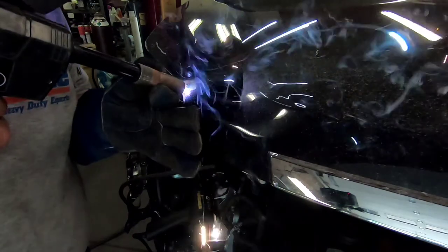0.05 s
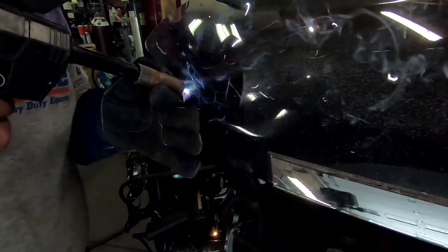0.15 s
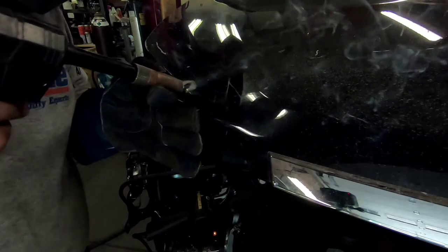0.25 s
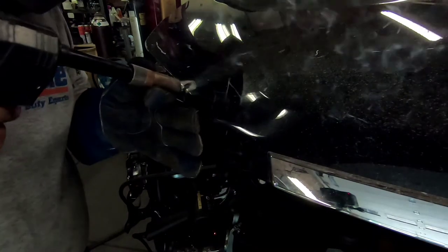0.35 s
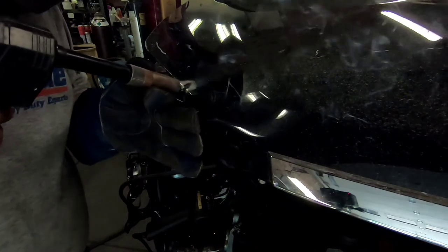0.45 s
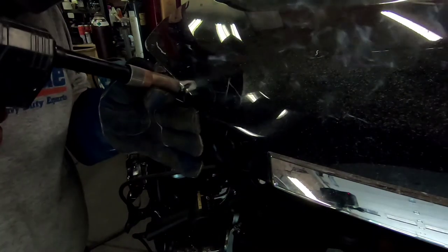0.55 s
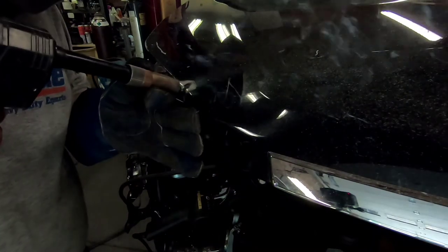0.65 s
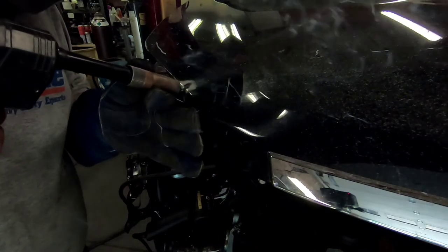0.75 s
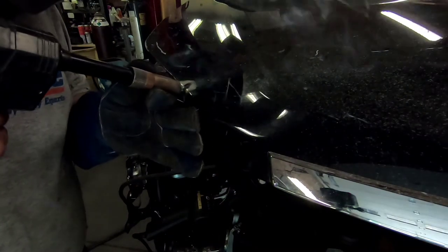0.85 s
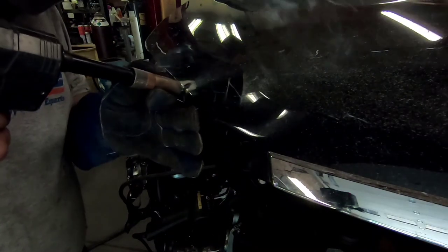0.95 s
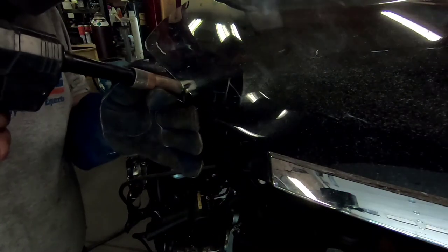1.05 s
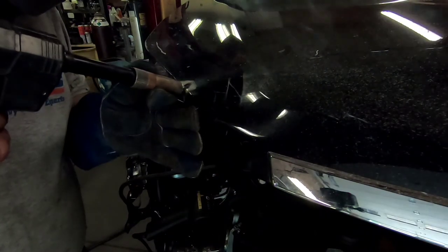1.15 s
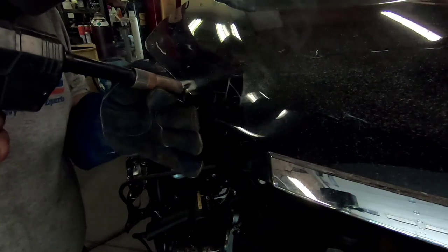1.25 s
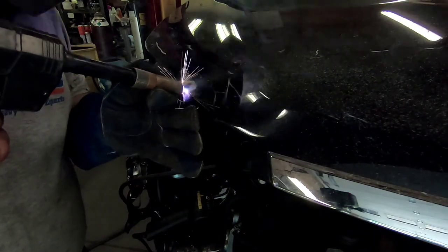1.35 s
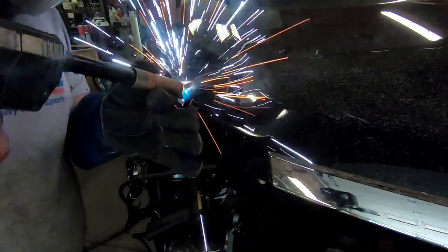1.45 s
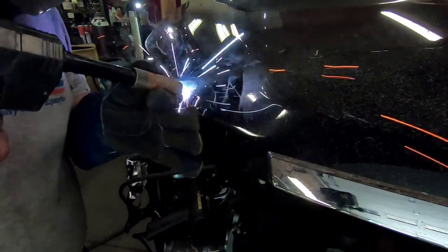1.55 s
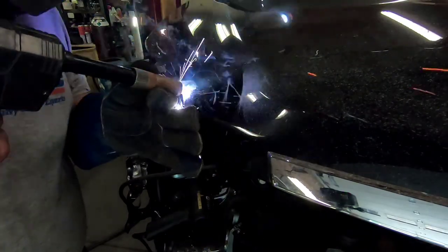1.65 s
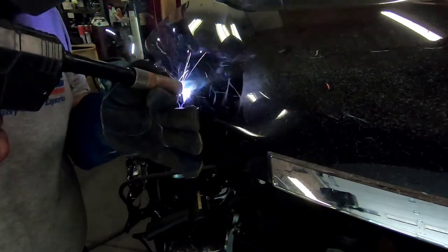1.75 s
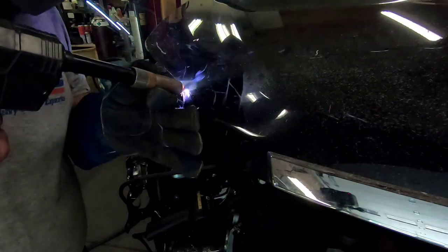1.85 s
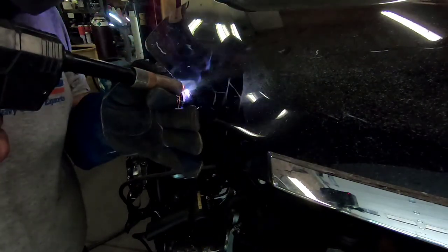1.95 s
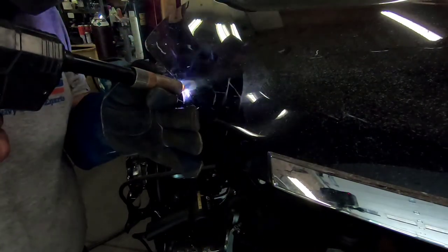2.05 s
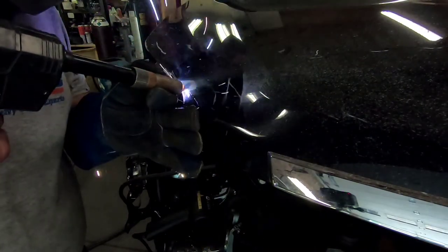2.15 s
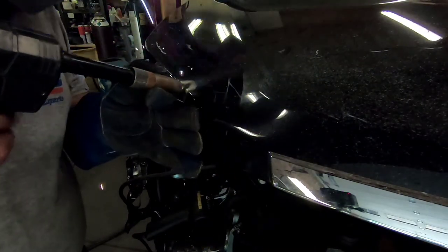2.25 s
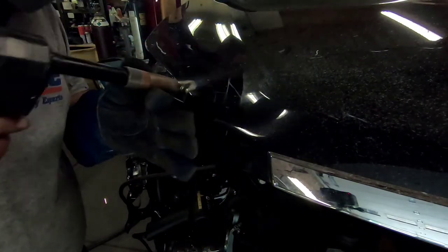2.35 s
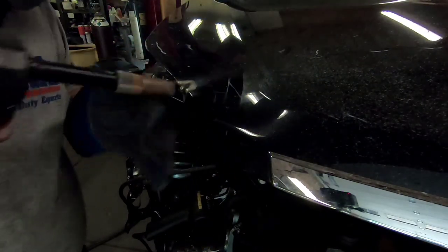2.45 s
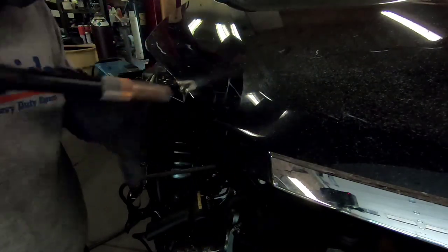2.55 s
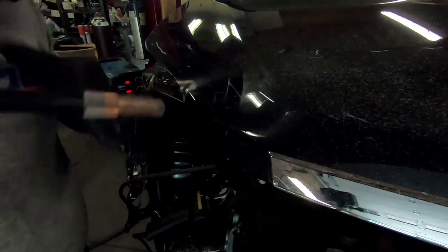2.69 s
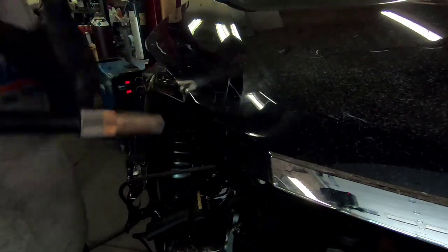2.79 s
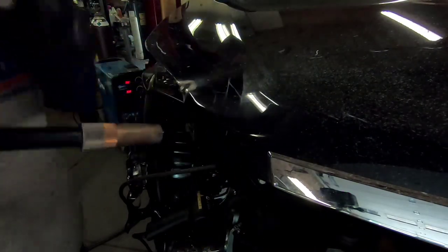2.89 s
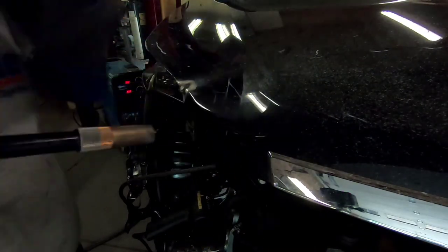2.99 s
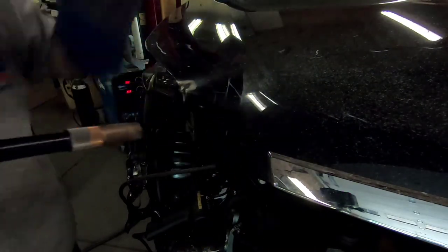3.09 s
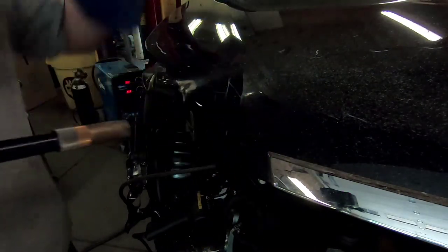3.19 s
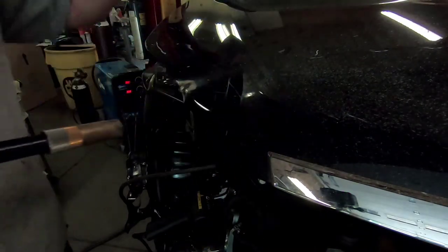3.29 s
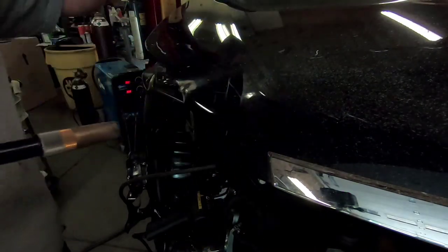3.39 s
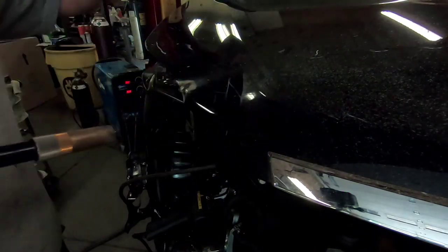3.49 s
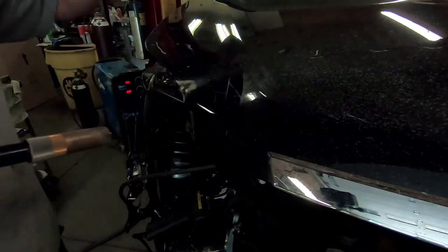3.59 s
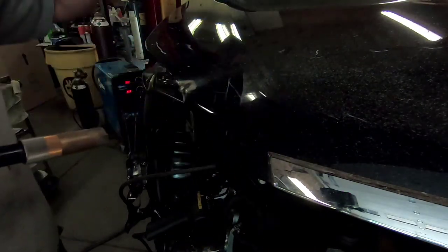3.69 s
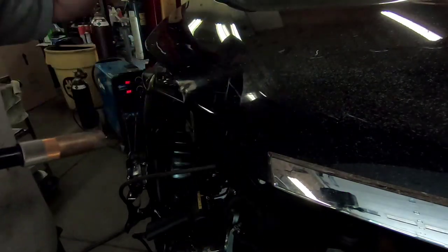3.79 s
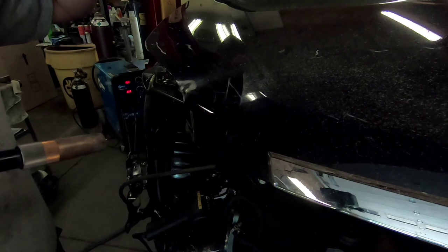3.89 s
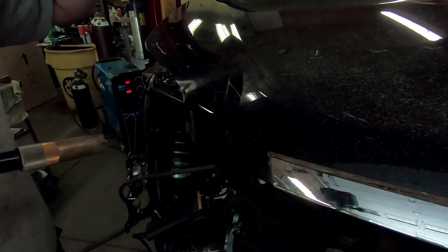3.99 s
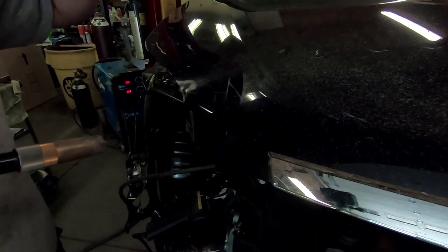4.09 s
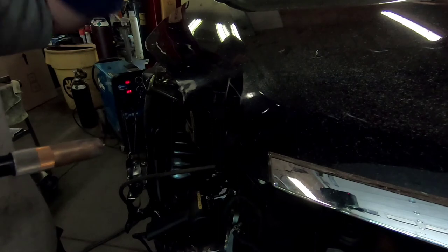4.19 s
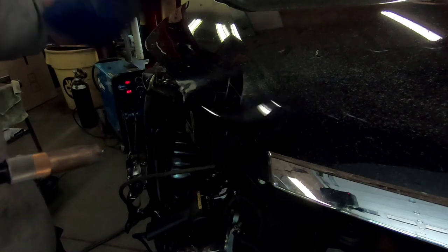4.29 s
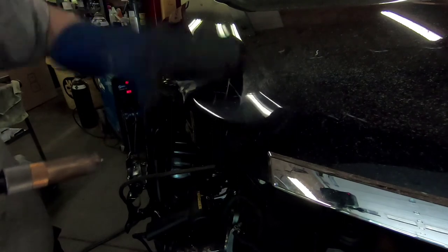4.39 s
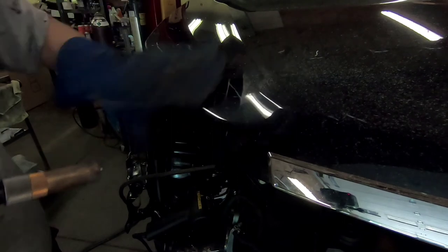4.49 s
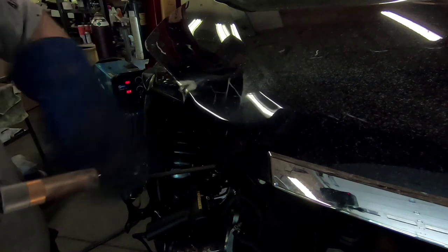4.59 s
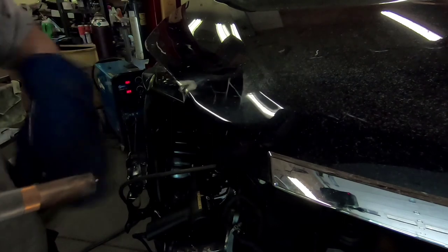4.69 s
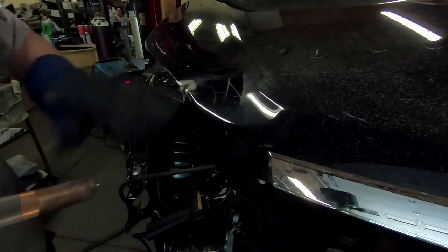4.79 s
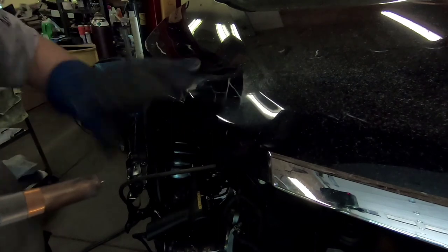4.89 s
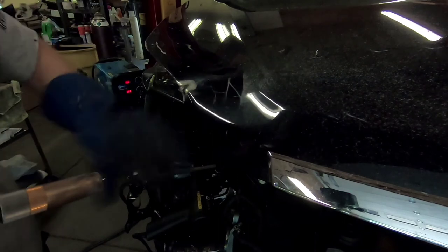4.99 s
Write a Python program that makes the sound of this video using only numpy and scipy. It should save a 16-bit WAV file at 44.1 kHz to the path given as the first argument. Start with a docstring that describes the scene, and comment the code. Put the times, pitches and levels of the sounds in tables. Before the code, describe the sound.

Loud, dry, close welding crackle stops almost at once, leaving faint distant rumble and a soft puff. Gas gushes out, the arc restarts unevenly with hard pops, and it spits steadily for under a second. Afterwards come a faint puff, cloth rubbing, a short metallic slide and several boomy handling knocks, with short garage echo.

```python
"""A garage with distant rumble outside, heard by a small camera with two microphone ports, a metre from
a wire-feed welder: one weld ends, then come a pause, a gush of shielding gas, a stuttering start and a steady
crackle. The welder then shifts, cloth rustles, and a glove knocks the frame that the camera rests on.
Welding and cloth are clicks and noise shaped by resonances; the knocks are fading sine waves; the gas and
rumble are filtered noise, and random echoes stand for the walls."""
import sys
import numpy as np
from scipy import signal
from scipy.fft import rfft, irfft
from scipy.io import wavfile
from scipy.ndimage import uniform_filter1d

SR = 44100
rng = np.random.default_rng(int(sys.argv[2]) if len(sys.argv) > 2 else 0)


def makeup_ratio(level_db):
    """Linear amplitude ratio for a level in decibels (20 dB per factor of ten)."""
    decades = np.asarray(level_db, float) / 20
    return 10 ** decades


def to_wav(sig):
    """Store sig (one row per channel, or 1-D mono) as 16-bit WAV at the path in sys.argv[1].

    Samples outside -1..1 are clipped; the rate is SR.
    """
    pcm = np.clip(np.atleast_2d(sig), -1, 1) * 32767
    pcm = np.round(pcm).astype(np.int16)
    wavfile.write(sys.argv[1], SR, pcm.T)  # frames by channels


N = 222264  # length in samples
T = np.arange(N) / SR  # time in seconds
HZ = np.fft.rfftfreq(4096, 1 / SR)  # frequencies at which filters are drawn

# All dB levels are relative ones, set before any resonance, echo or rounding of peaks.

# The arc striking again, each time with a cluster of sparks. Each row: start in seconds, level of the first
# snap in dB, level of the cluster in dB, length of the cluster in milliseconds.
STRIKES = [(0.0, -0.5, -23.5, 1.7), (0.0165, -3, -23, 6.9), (0.037, -3.5, -19.5, 6.2),
           (0.0524, -12.5, -34, 1.5), (0.0862, -1, -25.5, 6.6), (0.1172, -20, -25.5, 11),
           (0.1334, -13, -23.5, 13.4), (0.1573, 1, -26.5, 14.5), (0.1916, -8, -25.5, 15.4),
           (0.2173, -18, -31.5, 1.5), (0.2328, -10.5, -37.5, 2.2), (1.401, 2, -22, 1),
           (1.433, -3, -26, 1.7), (1.442, -0.5, -20.5, 1.2), (1.4509, -20, -23, 7),
           (1.4901, 8, -12.5, 2.44), (1.599, 0, -16.5, 2.2), (1.608, -6, -22.5, 6.9),
           (1.6434, -11.5, -27, 5.2), (1.6762, -10, -21, 4.6), (1.693, 1.5, -25, 12),
           (1.7154, -1.5, -23.5, 9.6), (1.7482, 0.5, -33, 8.4), (1.7707, -7, -20.5, 6.3),
           (1.8267, 0, -24, 12), (1.8684, 2, -31, 7.8), (1.887, -3, -21, 8), (1.9547, -1.5, -25, 11.4),
           (1.9928, -5, -26, 5.7), (2.0315, -1, -25, 3.8), (2.0542, -3, -21.5, 8), (2.0832, -7, -22.5, 9.5),
           (2.115, -2.5, -27, 10), (2.1315, -8, -28.5, 21), (2.1523, -3, -25.5, 10.4), (2.1795, -5, -23, 8),
           (2.2346, -16.5, -20.5, 6.9), (2.2549, -16.5, -20.5, 7.3), (2.2849, -2.5, -28, 9)]
# The arc burning, with small sparks between strikes. Each row: time it has settled in seconds, time the wire
# stops in seconds, level of the sizzle in dB, level of the low roar in dB.
WELDS = [(0.077, 0.197, -33, -41.5), (1.797, 2.285, -31.5, -40.5)]
# The sizzle creeps up from SETTLE_DB below its level and dies by 40 dB in QUENCH_S.
SETTLE_S, SETTLE_DB, QUENCH_S = 0.13, -9, 0.081
# The pressure thump grows faster than its cluster: dB for a cluster at 0 dB, and dB gained per dB.
THUMP_DB, THUMP_SLOPE = 29.5, 2.96

# Shielding gas: a surge when the valve opens, sagging by 40 dB in SAG_S and leaving a steady flow.
VALVE_S, OPENING_S, SURGE_DB, SAG_S, FLOW_DB = 1.1455, 0.03, -19.5, 0.5, -35.5
# The camera likely turns its gain down once the arc starts, so the hiss is heard fainter, at a set level.
# When the wire stops, the hiss bleeds away by 40 dB in BLEED_S.
FIRST_STRIKE_S, ARC_HISS_DB, BLEED_S = 1.41, -48, 0.067

# Tone of the sparks. Each row: frequency in Hz, level per Hz in dB.
SPARK_TONE = [(180, -31.5), (300, -3), (492, -6.5), (892, -6), (1330, -4), (2000, -2.5), (2400, -2.5),
              (3400, -1.5), (5050, -3), (5480, -2), (8560, -12), (9760, -18.5), (15500, -25)]
# Tone of the gas jet. Each row: frequency in Hz, level per Hz in dB.
JET_TONE = [(350, -43.5), (600, -26.5), (1150, -17.5), (1530, -21.5), (2100, -12), (3000, -5.5),
            (3700, -2.5), (4500, -7), (6000, -18), (8200, -24), (9760, -26.5), (12000, -27), (15500, -45.5)]
# Resonances of the work piece and camera housing. Each row: frequency in Hz, width in Hz, lift in dB.
HOUSING = [(873, 150, 3.5), (2068, 370, 6.5), (2770, 220, 4.5), (3423, 340, 6), (4700, 120, 4.5),
           (5400, 180, 5.5), (6400, 590, 7), (7800, 380, 11.5), (9505, 300, 15.5)]
# How much louder the torch is at the first port than at the second. Each row: frequency in Hz, gap in dB.
PORT_DB = [(1000, 0.5), (3500, 2), (5000, -2.5), (6500, -6), (8300, 4), (9600, 8), (11000, 11), (15000, 7)]
# How far the first port's phase leads the second's. Each row: frequency in Hz, lead in radians.
PORT_RAD = [(0, 0.5), (4500, 0.32), (6000, 1.23), (7000, 6), (9000, -0.5), (10000, 8.13), (12000, 1),
            (16000, 3.5)]

# Echo of the garage: time to fade by 60 dB in seconds, level in dB.
GARAGE_T60_S, GARAGE_DB = 0.61, -13.5
# Level of the background over time, dipping after loud strikes as the camera turns its gain down. Each row:
# time in seconds, then levels in dB of the high layer (above about 300 Hz), the middle layer (about 100 to
# 300 Hz) and the low layer (below about 100 Hz).
BACKGROUND = [(0, -60, -43, -47), (0.301, -57, -62, -60), (.75, -53, -54, -51), (1.45, -48, -49.5, -57),
              (1.55, -71, -45, -49), (2.3, -54, -55.5, -59), (2.95, -48, -48.5, -59),
              (4.2, -49.5, -52.5, -60.5), (5.04, -51.5, -52.5, -67)]
# Tone of the rumble. Each row: frequency in Hz, level per Hz in dB.
YARD_TONE = [(15, -34), (25, -9), (54, -11), (76, -26.5), (147, 0), (237, -1), (400, -14.5), (1020, -7),
             (1500, -15.5), (2600, -29), (5840, -37.5), (14000, -80.5)]
# How alike the rumble is at the two ports. Each row: frequency in Hz, likeness (1 is the same, 0 or less
# is taken as unrelated).
YARD_ALIKE = [(60, 0.87), (130, 0.93), (290, 0.98), (640, 0.64), (1410, 0.21), (3100, -0.13), (6820, -0.15),
              (15000, 0.2)]

# A puff of hiss about half a second after each weld, probably the valve closing. Each row: loudest moment in
# seconds, level of the dull band in dB, level of the bright band in dB.
PUFFS = [(0.77, -47, -55.5), (2.852, -46.5, -55.5)]
PUFF_RISE_S, PUFF_FALL_S = 0.012, 0.4
# Cloth and glove rubbing. Each row: loudest moment in seconds, rise in seconds, fall in seconds, level of the
# dull band in dB, level of the bright band in dB.
RUBS = [(2.82, 0.11, 0.24, -61.5, -89), (3.3, 0.79, 1.1, -63, -67), (3.58, 1.5, 0.34, -76, -73),
        (4.35, 0.66, 0.068, -56, -67.5), (4.372, 0.02, 0.76, -50.5, -93), (4.49, 0.088, 0.11, -52, -56),
        (4.56, 0.2, .15, -49, -78), (4.587, 0.058, .03, -40, -75), (4.608, 0.032, .03, -41, -73),
        (4.628, .04, .03, -39, -58), (4.755, 0.018, 0.043, -59, -69), (4.86, 0.44, 0.17, -69, -86),
        (5.025, 0.08, .3, -48, -64)]

# Small hard ticks near the camera. Each row: start in seconds, level in dB, pitch in Hz.
TICKS = [(2.823, -32.5, 2200), (2.853, -23, 4450), (3.043, -25, 8050), (4.365, -22.5, 2320),
         (4.473, -6.5, 2520), (4.477, -7.5, 1800), (4.619, -38, 2500), (4.849, -25.5, 2100),
         (5.0168, -20, 3360), (5.027, -20, 3930)]
# Glove knocks. Each row: start in seconds, clack on the panel in dB, thud in the frame in dB.
KNOCKS = [(2.949, -65, -38), (4.365, -40.5, -70), (4.472, -20, -34), (4.481, -34, -15.5), (4.619, -25, -16),
          (4.847, -60, -33), (4.869, -22.5, -59), (4.873, -22, -43), (5.0183, -35.5, -38),
          (5.031, -55, -15)]
# Ringing of the frame. Each row: pitch in Hz, level in dB, time to fade by 60 dB in seconds.
FRAME_MODES = [(67.2, -18, 1), (85.5, -11, 0.46), (154, -3, 0.036), (196, 4, 0.013)]
# Ringing of the panel. Each row: pitch in Hz, level in dB, time to fade by 60 dB in seconds.
PANEL_MODES = [(261, 3, 0.11), (440, 7.5, 0.15), (652, 5.5, 0.1), (835, -14, 0.084), (970, 9, 0.022),
               (1564, 3, 0.056), (2100, -23, 0.03)]
# The glove dragging on the frame. Each row: start of full strength in seconds, length in seconds, low shaking
# in dB, scrape at roughly 0.2 to 1.5 kHz in dB.
DRAGS = [(4.476, 0.1, -31, -47), (4.602, 0.033, -32.5, -43.5), (4.874, 0.014, -38.5, -35.5),
         (5.02, 0.016, -34, -40)]
GRIP_S, SHAKE_FALL_S, SCRAPE_FALL_S = 0.027, 0.26, 0.039  # rise of both, then the fall of each

# Something small slides and rings just before the glove strikes hard.
SLIDE_S, SLIDE_LENGTH_S, SLIDE_DB = 4.372, 0.041, -54
# Its resonances. Each row: frequency in Hz, width in Hz, level in dB.
SLIDE_RINGS = [(2300, 300, 4), (3700, 200, -0.5), (4600, 160, -5.5)]


def unit(x):
    """Scale to rms 1."""
    return x / np.sqrt(np.mean(x ** 2))


def on_hz(table, hz):
    """Read a table of frequencies and values on a log-frequency axis."""
    f, value = np.transpose(table)
    return np.interp(np.log(hz + 1), np.log(f + 1), value)


def band(x, lo_hz, hi_hz):
    """Keep the sound between two frequencies."""
    edges = [lo_hz, min(hi_hz, .45 * SR)]
    return signal.sosfilt(signal.butter(2, edges, "band", fs=SR, output="sos"), x)


def swell(s, rise_s, hold_s, fall_s, from_db=-40):
    """Gain that climbs from from_db to 1 at time s, holds, sinks by 40 dB, then cuts to silence."""
    corners = s + np.cumsum([-rise_s, rise_s, hold_s, fall_s])
    return makeup_ratio(np.interp(T, corners, [from_db, 0, 0, -40], -200, -200))


def walk(rate):
    """Wandering level: random values, rate of them a second, smoothed twice; spread about 1."""
    hold = int(SR / rate)
    steps = np.repeat(rng.standard_normal(N // hold + 1), hold)
    return unit(uniform_filter1d(uniform_filter1d(steps, hold), hold)[:N])


def sparks(rate, spread_db, pull):
    """Clicks at uneven gaps and of uneven size; the share pull goes negative (the plasma collapses)."""
    gap, sign, size = rng.random((int(2 * rate * N / SR), 3)).T
    when = np.cumsum((.25 + 1.5 * gap) * SR / rate).astype(int)
    clicks = np.zeros(when[-1] + 1)
    loudness_db = spread_db * np.minimum(-np.log(size), 4)  # many weak ones, few strong ones
    clicks[when] = np.where(sign < pull, -1., 1.) * makeup_ratio(loudness_db)
    return unit(clicks[:N])


def thump(hz, t60):
    """A sine wave that fades by 60 dB in t60 seconds, as a struck or pushed body does."""
    t = T[:8000]
    return np.sin(2 * np.pi * hz * t) * makeup_ratio(-60 * t / t60)


def modes(table):
    """Sum of the fading sine waves in which a solid body rings."""
    return sum(makeup_ratio(db) * thump(hz, t60) for hz, db, t60 in table)


def causal(db, side_db=0, rad=0):
    """Shortest response with this gain, scaled to unit energy, then tilted and phase-turned for one port."""
    cepstrum = irfft(db * np.log(10) / 20)
    # folding the cepstrum puts the energy as early as possible
    cepstrum[1:2048] *= 2
    cepstrum[2049:] = 0
    gain = np.exp(rfft(cepstrum))
    energy = np.mean(np.abs(gain) ** 2)
    response = irfft(gain * makeup_ratio(side_db) * np.exp(1j * rad)) / np.sqrt(energy)
    return np.roll(response, 32)[:2048]  # 32 samples of room for what the turn moves earlier


def through(x, response):
    """Pass a sound through a response, undoing its 32-sample lead-in."""
    return signal.fftconvolve(x, response)[32:N + 32]


def housing():
    """Lift in dB over frequency from the resonances of the work piece and camera housing."""
    return sum(lift * np.exp(-((HZ - f) / width) ** 2) for f, width, lift in HOUSING)


def ports(x, tone):
    """A source at the torch, coloured by work piece and housing, as each port hears it."""
    db = on_hz(tone, HZ) + housing()
    side_db = on_hz(PORT_DB, HZ) / 2
    rad = np.interp(HZ, *np.transpose(PORT_RAD)) / 2
    return np.array([through(x, causal(db, side_db, rad)), through(x, causal(db, -side_db, -rad))])


def arc():
    """Each strike is a snap, a short cluster of sparks and a pressure thump, over a bed of small sparks."""
    snaps, cluster, push = np.zeros(N), np.zeros(N), np.zeros(N)
    for s, snap_db, cluster_db, ms in STRIKES:
        i = int(s * SR)
        t = T[:2000] * 1000 / max(ms, .3)  # time in cluster lengths
        snaps[i] -= makeup_ratio(snap_db)
        cluster[i:i + 2000] += makeup_ratio(cluster_db) * np.exp(-t ** 4)
        push[i] += makeup_ratio(THUMP_DB + THUMP_SLOPE * cluster_db)

    bed, roar = sum(makeup_ratio(np.array(dbs))[:, None] * swell(s, SETTLE_S, stop - s, QUENCH_S, from_db=SETTLE_DB)
                    for s, stop, *dbs in WELDS)
    bed = bed * makeup_ratio(1.6 * walk(90))  # the sizzle flickers

    # strong sparks of like size in the clusters, scattered ones between
    cracks = snaps + cluster * sparks(650., 1.5, .6) + 1.1 * bed * sparks(380., 2.5, .8)
    # a spark lasts a few samples, so it is duller than the fizz around it
    cracks = signal.lfilter([.85], [1, -.4], cracks)
    fizz = (0.11 * cluster + 0.6 * bed) * rng.standard_normal((3, N))
    # the highest fizz is partly unrelated at the two ports
    high_fizz = np.array([ports(band(fizz[1 + k], 6000., 18000.), SPARK_TONE)[k] for k in range(2)])

    # the thump swells over a few ms, and the work piece booms faintly after it
    swing = thump(140., 0.018) * (1 - np.exp(-T[:8000] / 0.0034))
    swing = swing + 0.0086 * thump(110., 0.36)
    low = signal.fftconvolve(push, swing / np.abs(swing).max())[:N]
    low = low + roar * unit(band(rng.standard_normal(N), 110., 302.))
    return ports(cracks + fizz[0], SPARK_TONE) + 2.54 * high_fizz + low


def gas():
    """Turbulent jet as fluttering noise, with a thin whistle from the nozzle in two narrow bands."""
    surge = makeup_ratio(SURGE_DB) * swell(VALVE_S, OPENING_S, 0, SAG_S)
    steady = makeup_ratio(FLOW_DB) * (T > VALVE_S)
    hiss = (surge + steady) * swell(0, 0, FIRST_STRIKE_S, .04)
    for start, (_, stop, *_) in zip((0, FIRST_STRIKE_S), WELDS):
        hiss = hiss + makeup_ratio(ARC_HISS_DB) * swell(start, .01, stop - start, BLEED_S)
    jet = rng.standard_normal(N)
    jet = jet + 0.92 * band(jet, 3420., 3550.) + 1.4 * band(jet, 3770., 3850.)
    return ports(hiss * makeup_ratio(1.1 * walk(170)) * jet, JET_TONE)


def garage(x):
    """Diffuse echo of the walls, different at each port; the open door lets the bass out."""
    t = T[:30000]
    echoing = band(x, 270., 14000.)
    echoes = []
    for channel in echoing:
        build_up = np.clip((t - .004) / 0.016, 0, 1)  # nothing in the first 4 ms, full at 20 ms
        tail = rng.standard_normal(len(t)) * makeup_ratio(-60 * t / GARAGE_T60_S) * build_up
        echoes.append(signal.fftconvolve(channel, tail / np.sqrt(np.sum(tail ** 2)))[:N])
    return np.array(echoes)


def yard():
    """Half-octave bands of distant rumble, each flickering alone; the bass is alike at both ports."""
    s, *levels_db = np.transpose(BACKGROUND)
    high, middle, low = (makeup_ratio(np.interp(T, s, db)) for db in levels_db)
    layers = np.zeros((3, 2, N))  # low, middle and high, at two ports
    for hz in 28 * 2 ** np.arange(0, 9, .5):
        common, opposed = (unit(band(rng.standard_normal(N), hz / 1.18, hz * 1.18)) for _ in range(2))
        alike = np.clip(on_hz(YARD_ALIKE, hz), 0, .98)
        pair = np.sqrt(1 + alike) * common + np.sqrt(1 - alike) * opposed * np.array([[1], [-1]])
        level = makeup_ratio(on_hz(YARD_TONE, hz) + 1.5 * walk(8)) * np.sqrt(hz)  # wider bands hold more power
        layers[int(hz > 100) + int(hz > 330)] += level * pair
    return low * unit(layers[0]) + middle * unit(layers[1]) + high * unit(layers[2])


def rustle():
    """Puffs and rubbing: fine grains in a dull and a bright band, partly unrelated at the two ports."""
    rows = RUBS + [(s, PUFF_RISE_S, PUFF_FALL_S, *dbs) for s, *dbs in PUFFS]
    dull, bright = sum(makeup_ratio(np.array(dbs))[:, None] * swell(s, rise, 0, fall) for s, rise, fall, *dbs in rows)
    shared = sparks(6000., 3.9, .5)
    out = []
    for _ in range(2):
        own = sparks(6000., 1.5, 0.69)
        grains = through(shared + 1.6 * own, causal(0.574 * housing()))
        dull_grains = band(band(grains, 1700., 5200.), 1200., 8000.)
        bright_grains = band(band(grains, 5400., 11000.), 5400., 11000.)
        out.append(dull * unit(dull_grains) + bright * unit(bright_grains))
    return np.array(out)


def frame():
    """Knocks tick, clack on a panel and ring the frame's low modes; dragging shakes and scrapes it."""
    ticks, clack, thud = np.zeros((3, N + 400))
    for s, tick_db, tick_hz in TICKS:
        i = int(s * SR)
        # a tick is a few cycles long, whatever its pitch
        ticks[i:i + 400] += makeup_ratio(tick_db) * thump(tick_hz, 4.1 / tick_hz)[:400]
    for s, clack_db, thud_db in KNOCKS:
        i = int(s * SR)
        clack[i] = makeup_ratio(clack_db)
        thud[i] = makeup_ratio(thud_db)

    ring = np.convolve(modes(FRAME_MODES), np.hanning(90))  # a padded hand pushes for about 2 ms
    panel = np.convolve(modes(PANEL_MODES), np.hanning(9))  # the clack is a much shorter push
    clacks = signal.fftconvolve(clack, panel / np.abs(panel).max())[:N]
    thuds = signal.fftconvolve(thud, ring / np.abs(ring).max())[:N]

    shaking = sum(makeup_ratio(db) * swell(s, GRIP_S, length, SHAKE_FALL_S) for s, length, db, _ in DRAGS)
    scraping = sum(makeup_ratio(db) * swell(s, GRIP_S, length, SCRAPE_FALL_S) for s, length, _, db in DRAGS)
    shake = shaking * unit(signal.fftconvolve(rng.standard_normal(N), thump(84., 0.016))[:N])
    scrape = scraping * unit(band(band(sparks(2500., 0.94, .5), 225., 1530.), 220., 1470.))

    # vibration through the body reaches the ports unequally
    body = thuds + shake + scrape
    wobble = shaking * makeup_ratio(-1.) * unit(band(rng.standard_normal(N), 38., 94.))
    return band(ticks[:N], 620., 9000.) + clacks + np.array([body + wobble, makeup_ratio(6.) * body - wobble])


def slide():
    """Friction grains ringing a few narrow resonances of something small."""
    grains = sparks(3000., 2.3, 0.39)
    rings = sum(makeup_ratio(db) * unit(band(grains, hz - width / 2, hz + width / 2)) for hz, width, db in SLIDE_RINGS)
    return makeup_ratio(SLIDE_DB) * swell(SLIDE_S, 0.041, SLIDE_LENGTH_S, 0.14) * rings


def scene():
    """Torch, welder and frame in the garage, over the yard."""
    near = arc() + gas() + rustle() + slide() + frame()
    return near + makeup_ratio(GARAGE_DB) * garage(near) + yard()


def roll_off(x):
    """The treble ends steeply here."""
    return signal.sosfilt(signal.butter(12, 15750, fs=SR, output="sos"), x)


def record(dry):
    """The camera trims the deepest bass and rounds the loudest snaps."""
    trimmed = signal.sosfilt(signal.butter(1, 20., "high", fs=SR, output="sos"), dry)
    mix = np.tanh(1.237 * trimmed) / 1.337
    return roll_off(mix)


dry = scene()
out = record(dry)
to_wav(out)
```